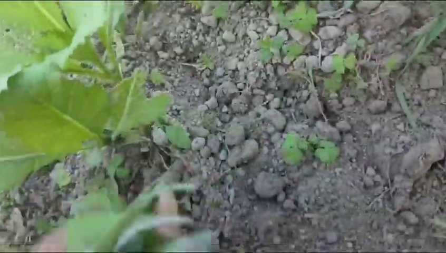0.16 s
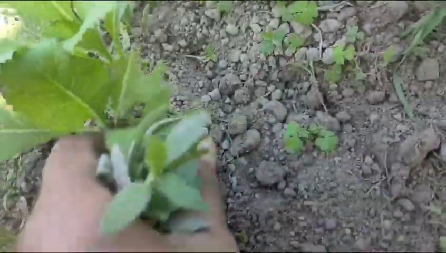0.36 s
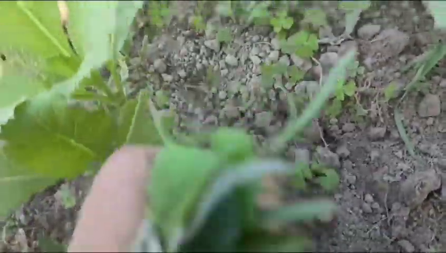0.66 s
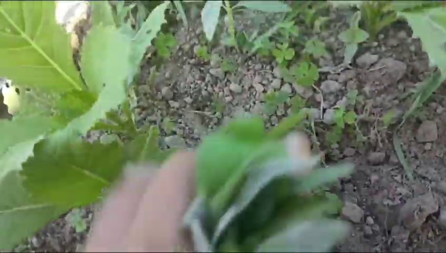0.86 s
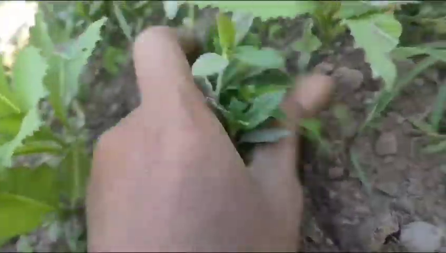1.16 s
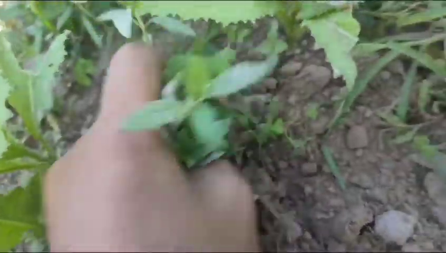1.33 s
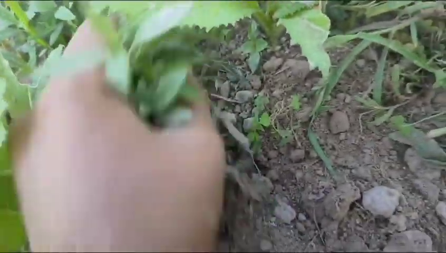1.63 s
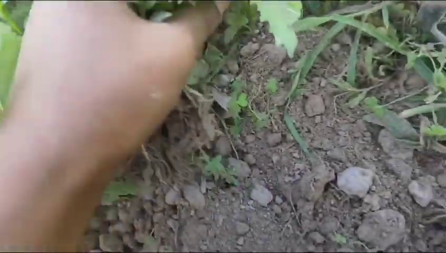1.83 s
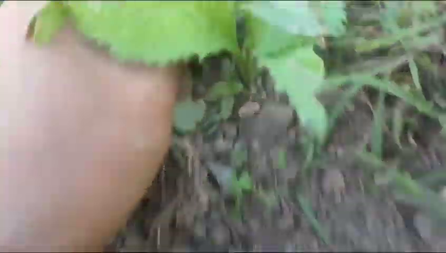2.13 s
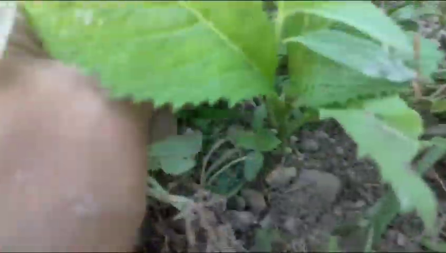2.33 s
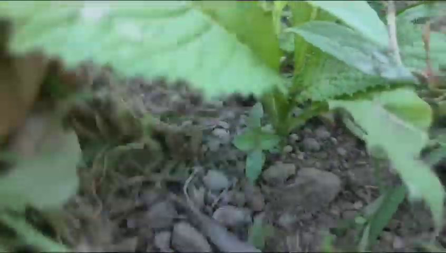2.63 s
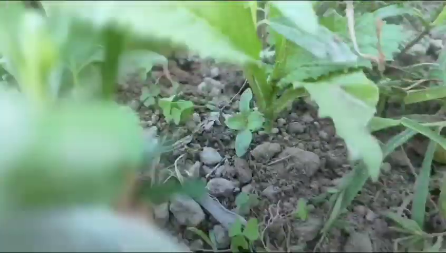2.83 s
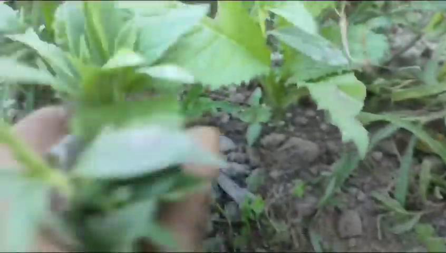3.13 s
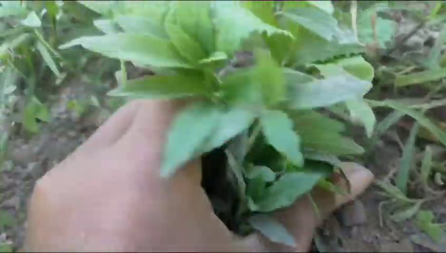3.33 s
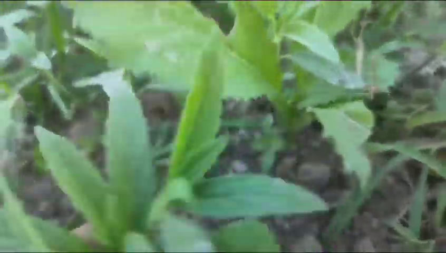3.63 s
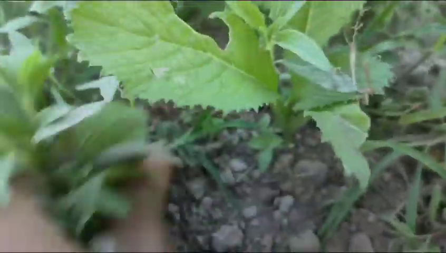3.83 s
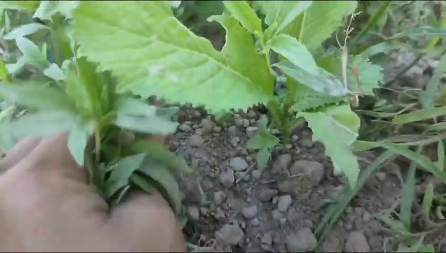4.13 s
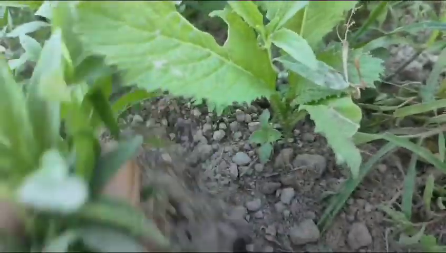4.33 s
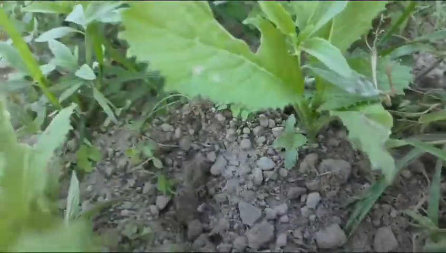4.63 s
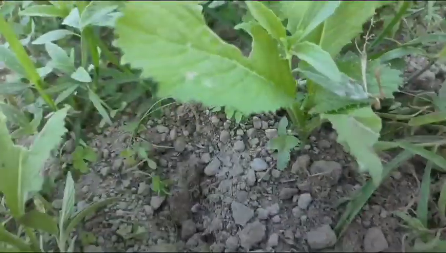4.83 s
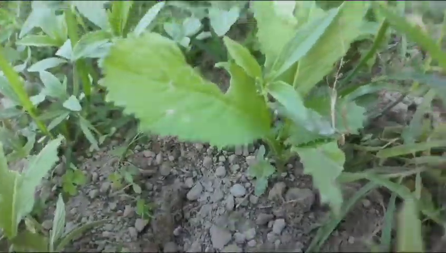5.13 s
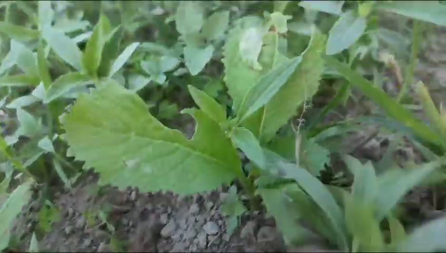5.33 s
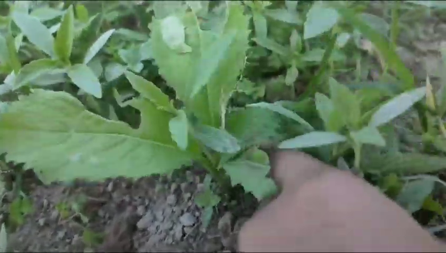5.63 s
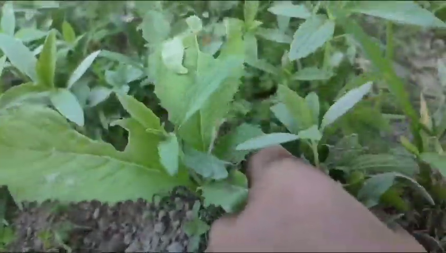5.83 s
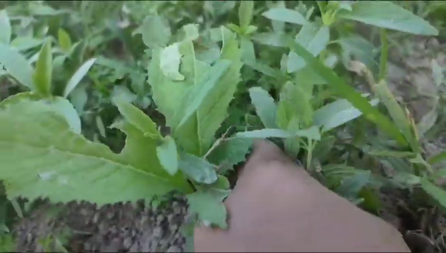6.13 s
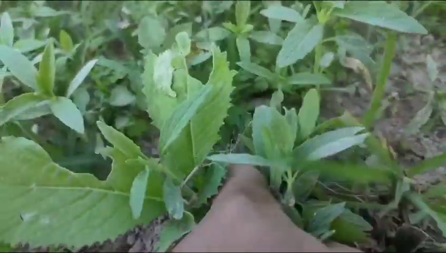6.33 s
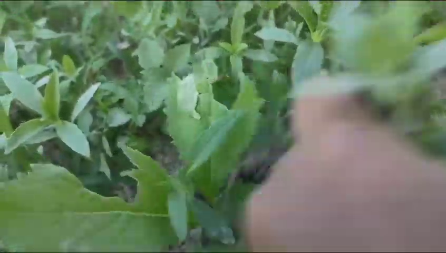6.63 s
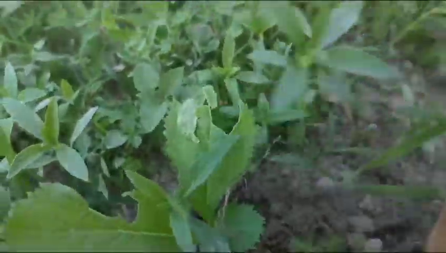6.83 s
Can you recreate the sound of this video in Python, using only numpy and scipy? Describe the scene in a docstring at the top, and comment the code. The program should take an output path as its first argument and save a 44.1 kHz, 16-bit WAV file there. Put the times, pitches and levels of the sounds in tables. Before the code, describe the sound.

A hand pulls weeds from dry soil very close to the microphone, mostly left of centre. Soft leaf swishes, finger scrapes and crumbling earth come in uneven strokes throughout, with small stem snaps at about 1 and 1.4 seconds. From 2.2 seconds the tugging thickens, and roots break with strong, crisp snaps at 2.5. At 2.9 seconds the bunch hits the microphone on the left: one sharp, slightly distorted knock with a short low thump and a spray of crumbs, by far the loudest sound. Light rustling continues, with a tick at 3.5 seconds and several snaps around 4.2. After a softer stretch with scattered ticks, another cluster of snaps and crumbling soil comes at about 6.6. Behind it all lie a quiet field hush, a faint unsteady rumble and a low purr that comes and goes. A very faint, thin whistle rises between 1.2 and 1.9 seconds.

```python
"""Weeding dry soil, close up

A hand pulls weeds just under a phone with two microphone ports, the left one nearer. Leaves swish,
fingers scrape, soil crumbles, stems and roots snap, and once the bunch knocks the phone hard enough
to clip. Behind lie a low rumble, a purr that comes and goes, a thin rising whistle and a quiet field."""
import sys
import numpy as np
from scipy import signal
from scipy.fft import rfft, irfft, next_fast_len
from scipy.io import wavfile
from scipy.ndimage import uniform_filter1d

SR = 44100
rng = np.random.default_rng(int(sys.argv[2]) if len(sys.argv) > 2 else 0)


def generate_wav(sig):
    """Save sig (samples, or channels by samples) to the path in sys.argv[1] as 16-bit PCM at SR."""
    pcm = np.round(np.clip(np.atleast_2d(sig).T, -1, 1) * 32767).astype(np.int16)
    wavfile.write(sys.argv[1], SR, pcm)


N = 307813
FFT_SIZE = next_fast_len(N, real=True)

# tone of each noise at the microphone: (frequency [Hz], relative spectral level [dB])
FIELD_SPECTRUM = [(130, -5), (250, -4), (400, -9), (600, -14), (1000, -18.5), (2000, -21.5), (3000, -26),
                  (5000, -31), (6500, -31), (7600, -28.5), (8600, -25), (10000, -28.5), (13000, -31),
                  (15800, -34)]
RUMBLE_SPECTRUM = [(15, -43), (30, -18.5), (45, -6), (62, -4.5), (90, -0.5), (120, -11), (200, -26)]
LEAF_SPECTRUM = [(2600, -32.5), (3500, -7), (5000, -6), (6600, -9), (8000, 0), (11000, -0.5), (14800, -3.5),
                 (16500, -12)]
SCRAPE_SPECTRUM = [(1600, -31.5), (2250, -12), (2600, -3), (2900, -12), (4500, -17), (6500, -30.5)]
SOIL_SPECTRUM = [(250, -20), (500, -1), (1000, -2.5), (1500, -2), (2000, -5), (3500, -21)]
# course of the rumble: (time [s], level [dB])
RUMBLE_LEVELS = [(0, -58.5), (.33, -68), (.5, -63), (.89, -66.5), (1.28, -60.5), (1.52, -60), (2.19, -58.5),
                 (2.45, -59.5), (2.84, -53.5), (3.26, -63), (3.77, -61.5), (4.15, -55.5), (4.48, -59),
                 (4.69, -65.5), (4.98, -56), (5.11, -66), (5.28, -60), (5.5, -69), (5.62, -63),
                 (5.9, -65.5), (6.2, -61.5), (6.3, -68.5), (6.7, -59.5), (6.93, -60)]
# swells in the background: (peak time [s], rise [s], fall [s], level [dB])
WHISTLE_SWELLS = [(1.3, .07, .25, -77), (1.45, .3, .2, -81), (1.79, .12, .09, -78)]
PURR_SWELLS = [(0.02, .2, 0.26, -57), (0.486, 0.027, 0.055, -67), (0.62, 0.1, .2, -69),
               (1.03, 0.086, 0.1, -58), (1.29, 0.17, 0.44, -64), (1.42, 0.48, 0.11, -72),
               (1.9, 0.4, .9, -70), (2.5, 0.37, 0.21, -56), (2.84, 0.26, .4, -60),
               (2.961, .3, 0.044, -58.5), (3.151, .5, 0.15, -67), (3.41, 0.16, 0.26, -71),
               (3.63, 0.14, .4, -57.5), (3.98, .3, .3, -68.5), (3.855, .2, .04, -51.5), (4.15, .7, .6, -63),
               (4.49, 0.3, 0.78, -61), (4.99, 0.63, 0.09, -57), (5.27, 0.25, 0.095, -71),
               (5.62, 0.19, 0.56, -61.5), (5.98, .3, 0.38, -73.5), (6.22, .3, 0.073, -74),
               (6.31, .13, 0.2, -77), (6.45, 0.037, 0.24, -69.5), (6.65, 0.093, 0.17, -58)]
# hand strokes, except the last row, which is a brief click at the very end, to the right:
# (peak time [s], rise [s], fall [s], leaf level [dB], scrape level [dB], soil level [dB],
# leaves' left minus right [dB])
RUSTLE_SWELLS = [(0.025, 0.25, 0.061, -57.5, -71.5, -67.5, 6), (0.251, .15, 0.035, -61.5, -69, -69, 3),
                 (0.488, 0.038, 0.043, -60, -79, -72.5, 11.5), (0.594, 0.14, 0.11, -83, -80.5, -71.5, 3),
                 (0.786, 0.033, 0.11, -73, -88, -91, 8), (0.888, .07, .07, -76, -68, -76, -1),
                 (1.024, 0.05, 0.14, -70, -73, -62.5, 4.5), (1.265, 0.044, 0.1, -61.5, -70.5, -70, 4),
                 (1.407, 0.24, 0.09, -71, -73, -64.5, 5), (1.609, 0.048, .3, -85, -90, -80, 2),
                 (1.781, 0.055, 0.13, -64.5, -66, -66, 12), (2.03, 0.73, 0.18, -80, -76.5, -71.5, 8),
                 (2.195, 0.2, 0.76, -69, -73.5, -69, 9), (2.354, 0.063, 0.089, -63.5, -61.5, -58.5, 11.5),
                 (2.509, 0.064, 0.19, -61.5, -59.5, -56.5, 8), (2.589, 0.29, 0.096, -61, -75, -63, 14),
                 (2.724, 0.081, 0.13, -57.5, -72, -59.5, 15.5), (2.805, 0.15, .15, -61, -69, -61, 9.5),
                 (2.912, 0.084, .07, -47.5, -65, -47, 0.5), (3.133, 0.23, 0.17, -66, -68, -64.5, 10),
                 (3.316, 0.067, .16, -84, -78.5, -72.5, 2), (3.501, 0.071, .1, -63.5, -75, -71.5, 7),
                 (3.549, 0.073, 0.094, -67, -68, -63, 3.5), (3.769, 0.13, 0.28, -78, -80.5, -82, 3.5),
                 (3.96, 0.28, 0.38, -73, -75.5, -68.5, 9), (4.142, 0.16, .2, -58, -63, -69, 4.5),
                 (4.23, 0.22, 0.3, -76, -73, -61, 3.5), (4.35, .3, 0.11, -66, -72, -64.5, 11.5),
                 (4.645, 0.066, 0.041, -76.5, -84.5, -73, -0.5), (4.814, 0.049, 0.37, -75.5, -83, -70, 8),
                 (4.926, .09, 0.084, -60, -64, -76, 8.5), (5.151, 0.21, 0.22, -77.5, -85, -82, 2),
                 (5.27, 0.076, .06, -68, -68.5, -74, -5.5), (5.62, .25, 0.29, -84, -86.5, -78, -1.5),
                 (5.822, .15, 0.13, -75, -85.5, -73, 1), (5.965, 0.064, 0.084, -64, -68, -69, 0),
                 (6.09, 0.12, .3, -73, -78.5, -73.5, -1), (6.178, 0.29, 0.075, -75, -75.5, -76, 0.5),
                 (6.298, 0.072, 0.18, -81, -78.5, -74, 2), (6.45, 0.11, 0.091, -72.5, -74, -73, 3.5),
                 (6.603, 0.024, 0.18, -66, -63.5, -53.5, 1.5), (6.71, 0.15, 0.096, -66, -78, -70.5, -4),
                 (6.84, .3, 0.35, -79.5, -90.5, -78, -3), (6.98, 0.02, .1, -63.5, -85, -59.5, -15)]
# lift or cut of the swish above 11.5 kHz: (time [s], gain [dB])
LEAF_TREBLE = [(0, -5.5), (2, -5.5), (2.4, -12), (2.7, 3.5), (3.2, -5.5), (4.2, -0.5), (5.3, -0.5),
               (6.2, 1.5), (6.98, 2.5)]
# stems and roots breaking, each level before its part's trim: (time [s], ring pitch [Hz], ring [dB],
# bite [dB], crack [dB], thud [dB], left minus right [dB], ring T60 [s])
STEM_BREAKS = [(0.578, 980, -58, -59, -66, -70, 12, 0.0052),
               (0.5999, 1810, -55.5, -71, -72, -67, -18, 0.0063),
               (1.0227, 1970, -43.5, -58, -63, -48.5, -4, 0.0071),
               (1.0434, 1200, -52, -60, -72, -54, 3, 0.007),
               (1.391, 1320, -37.5, -44.5, -46.5, -48.5, 4.5, 0.0032),
               (1.6949, 1880, -57.5, -67, -79, -69, -16, 0.0074),
               (2.188, 3530, -66, -66, -52, -75, 8, 0.004), (2.25, 3420, -56, -60, -62, -75, 9, 0.0035),
               (2.265, 2500, -59, -60, -52, -70, 10, 0.004), (2.295, 596, -54, -63, -56, -58, 7, 0.0085),
               (2.3327, 1730, -30.5, -44, -58, -46, 8.5, 0.0042),
               (2.3389, 800, -46.5, -47, -64, -44.5, 8, 0.0098),
               (2.402, 690, -62, -50, -47.5, -69, 12, 0.007),
               (2.488, 1800, -16.5, -21.5, -27, -30, 4.5, 0.0028),
               (2.5043, 635, -33.5, -25.5, -39, -59, 4.5, 0.0054),
               (2.5275, 1060, -36, -29.5, -44, -39, 0, 0.0075),
               (2.5322, 1680, -21.5, -25, -48, -40, 7.5, 0.0029),
               (2.8544, 730, -57, -51, -31.5, -63, -8, 0.0056),
               (2.8636, 1090, -38.5, -41, -25, -56, 14, 0.0051),
               (2.887, 1086, -46, -46, -50.5, -58.5, 9, 0.0078),
               (3.5453, 2540, -52.5, -52.5, -40.5, -66, 4.5, 0.0057),
               (4.2147, 1314, -36.5, -43.5, -43, -51, 6, 0.0063),
               (4.245, 1260, -38.5, -46, -60, -54, 13, 0.0061),
               (4.2473, 1250, -35.5, -48, -55, -67, 6, 0.0068),
               (4.3088, 1430, -48.5, -45.5, -57, -58, 7, 0.007),
               (4.3254, 595, -45, -45, -37.5, -56, 10, 0.0029),
               (4.7116, 1600, -59, -75, -73.5, -58.5, -4.5, 0.0075),
               (4.8267, 794, -50.5, -73, -60, -54.5, 10, 0.008),
               (4.9427, 2620, -67, -44, -45, -59.5, 15.5, 0.0081),
               (5.9347, 2497, -52.5, -52, -53, -68.5, -5.5, 0.0077),
               (5.9845, 2257, -58.5, -56.5, -55.5, -61.5, -11, 0.011),
               (6.1476, 600, -73.5, -66, -50.5, -78.5, 1.5, 0.007),
               (6.309, 2290, -56.5, -53.5, -57, -70, -10, 0.008),
               (6.398, 686, -76.5, -71, -56, -74, 14, 0.0085),
               (6.4393, 1270, -50.5, -43, -47, -61.5, 3.5, 0.0061),
               (6.5895, 1395, -27, -47.5, -58, -50.5, 7.5, 0.0066),
               (6.5987, 935, -30, -46, -55, -45, 4, 0.0055), (6.613, 1260, -44, -51, -63, -57, 12.5, 0.007),
               (6.6204, 2340, -39.5, -43, -37.5, -46, 7.5, 0.0062),
               (6.6527, 1546, -25, -33, -48, -30, 9, 0.009),
               (6.83, 1328, -58.5, -74.5, -74, -74.5, 0, 0.012)]
# the bunch bouncing by the left port: (time [s], level [dB], pitch [Hz], T60 [s], build-up [s])
CASE_BOUNCES = [(2.8975, -18, 900, .012, .0003), (2.9004, 14, 1000, .0045, .0004),
                (2.90245, 9, 1020, .006, .00015), (2.9079, -1, 1400, .007, .0003)]
# the shaken case at the left port, then the right: (start [s], level [dB])
CASE_SWINGS = [(2.9060, -6.5), (2.9007, -2.5)]

PORT_LAG = 12  # samples from left port to right
FADE_DB, SWELL_POWER = 20, 1.1  # drop one rise or fall from a peak; a power above 1 rounds the top
FIELD_DB = -70.7
WHISTLE_HZ, WHISTLE_CLIMB_HZ_PER_S = 2030, 680  # pitch at the first swell's peak, and its climb
PURR_PULSES_PER_S, PURR_HZ, PURR_WIDTH_HZ = 46, 255, 130
REST_DB = -92, -94.5, -88  # leaves, scrape and soil while the hand rests
CRACK_BAND_HZ = 6000, 12500
SLAP_S, SLAP_DB, SLAP_T60_S = 2.9040, 9, 0.0031
CASE_START_HZ, CASE_END_HZ, CASE_SETTLE_S, CASE_T60_S = 320, 58.3, 0.0021, 0.055


def undb(db):
    return 10 ** (np.asarray(db) / 20)


def unit_rms(x):
    return x / np.sqrt(np.mean(x ** 2))


def colour(x, spectrum):
    """Shape a noise to a spectrum, at rms 1."""
    hz, db = np.transpose(spectrum)
    bin_hz = np.arange(FFT_SIZE // 2 + 1) * SR / FFT_SIZE
    gain = undb(np.interp(np.log(bin_hz + 1), np.log(hz), db, -90, -90))
    return unit_rms(irfft(rfft(x, FFT_SIZE) * gain, FFT_SIZE)[..., :N])


def curve(table):
    """Join (time, level) points with straight lines."""
    return np.interp(np.arange(N) / SR, *np.transpose(table))


def wander(rate_hz):
    """Glide between random values; spread near 1."""
    hold = int(SR / rate_hz)
    steps = np.repeat(rng.standard_normal(N // hold + 1), hold)
    return 1.2 * uniform_filter1d(steps, hold)[:N]


def swells(rows, levels_db):
    """Gain over time: each row climbs to its peak and falls away; powers add."""
    t, power = np.arange(0, N + 128, 128) / SR, 0
    for (peak_s, rise, fall, *_), db in zip(rows, levels_db):
        from_peak = np.maximum((peak_s - t) / rise, (t - peak_s) / fall)
        power = power + undb(np.reshape(db, (-1, 1)) - FADE_DB * from_peak ** SWELL_POWER) ** 2
    return np.array([np.interp(np.arange(N) / SR, t, gain) for gain in np.sqrt(power)])


def port_noise(alike_hz):
    """Noise at both ports: alike below alike_hz, unrelated above."""
    shared, *own = rng.standard_normal((3, N))
    lows = signal.lfilter(*signal.butter(1, alike_hz, fs=SR), shared)
    highs = signal.lfilter(*signal.butter(1, alike_hz, "high", fs=SR), own)
    return np.array([lows, np.roll(lows, PORT_LAG)]) + highs


def ring(hz, t60, push_s):
    """A mode struck by a push that takes a moment to build."""
    t = np.arange(4096) / SR
    return (1 - np.exp(-t / push_s)) ** 2 * undb(-60 * t / t60) * np.sin(2 * np.pi * hz * t)


def burst(t60, low_hz, high_hz, push_s=0.00038, size=4096):
    """Noise at both ports that builds in a moment and dies away."""
    band = signal.butter(2, [low_hz, high_hz], "band", fs=SR, output="sos")
    t = np.arange(size) / SR
    noise = unit_rms(signal.sosfilt(band, rng.standard_normal((2, size))))
    return noise * (1 - np.exp(-t / push_s)) * undb(-60 * t / t60)


def add(out, start_s, sound):
    i = int(start_s * SR)
    out[:, i:i + sound.shape[1]] += sound[:, :N - i]


def grains(spread_db, share):
    """Dense tiny cracks, a few much stronger than the rest."""
    strength = undb(spread_db * np.minimum(rng.exponential(size=(2, N)), 7))
    cracking = rng.random((2, N)) < share
    return strength * cracking * rng.standard_normal((2, N))


def patchy(x, spread_db, bins):
    """Small random patches of time and pitch stand out or sink: a flickering, faintly ringing grain."""
    spectrum = signal.stft(x, nperseg=512)[2]
    patches = uniform_filter1d(rng.standard_normal(spectrum.shape[1:]), size=bins, axis=0)
    patches = uniform_filter1d(patches, size=2 * bins, axis=1)
    return signal.istft(spectrum * undb(spread_db * unit_rms(patches)), nperseg=512)[1][:, :N]


def field():
    """The steady hush of the field around the microphone."""
    return colour(port_noise(alike_hz=300), FIELD_SPECTRUM) * undb(FIELD_DB)


def rumble():
    """A low, unsteady rumble, much alike at both ports."""
    noise = colour(port_noise(alike_hz=170), RUMBLE_SPECTRUM)
    return noise * undb(curve(RUMBLE_LEVELS) + 1.5 * wander(11))


def whistle():
    """A thin tone in the background, dead centre, that climbs and breaks up."""
    hz = WHISTLE_HZ + WHISTLE_CLIMB_HZ_PER_S * (np.arange(N) / SR - WHISTLE_SWELLS[0][0])
    gain = swells(WHISTLE_SWELLS, np.transpose(WHISTLE_SWELLS)[-1])[0] * undb(5.4 * wander(41))
    cycles = np.cumsum(hz + 14 * wander(54)) / SR
    return 2 ** .5 * gain * np.sin(2 * np.pi * cycles)


def purr():
    """Uneven pulses and about as much noise ring a hollow low resonance that comes and goes."""
    cycles = np.cumsum(PURR_PULSES_PER_S * (1 + 0.18 * wander(25)) / SR)
    pulses = np.diff(np.floor(cycles), prepend=0) * undb(3.5 * wander(40))
    drive = unit_rms(pulses) + 1.1 * port_noise(alike_hz=500)
    band = signal.iirpeak(PURR_HZ, PURR_HZ / PURR_WIDTH_HZ, SR)
    hollow = unit_rms(signal.lfilter(*band, signal.lfilter(*band, drive)))
    return hollow * swells(PURR_SWELLS, np.transpose(PURR_SWELLS)[-1])


def hand():
    """Just under the phone, leaves slide together, fingers scrape round stems, crumbs shift and fall."""
    rows = np.array(RUSTLE_SWELLS)
    side_db = np.outer(rows[:, -1], [1, -1]) / 2
    pan_shares = 1, .6, .5  # longer waves bend round the phone, so scrape and soil pan less
    leaf_gain, scrape_gain, soil_gain = (
        np.hypot(swells(rows, db[:, None] + share * side_db), undb(rest_db))
        for db, share, rest_db in zip(rows.T[3:6], pan_shares, REST_DB))
    leaves = colour(grains(spread_db=2.16, share=0.3), LEAF_SPECTRUM)
    leaves *= leaf_gain * undb(wander(90) + 2.1 * wander(28))
    treble = signal.sosfiltfilt(signal.butter(3, 11500, "high", fs=SR, output="sos"), leaves)
    leaves += (undb(curve(LEAF_TREBLE)) - 1) * treble
    scrape = colour(grains(spread_db=2.5, share=.2), SCRAPE_SPECTRUM)
    scrape *= scrape_gain * undb(1.4 * wander(50))
    soil = colour(grains(spread_db=3.0, share=0.22), SOIL_SPECTRUM)
    soil *= soil_gain * undb(1.2 * wander(40))
    return patchy(leaves + scrape + soil, spread_db=3.6, bins=4)


def snaps():
    """Close by, fibres creak; the break rings the stem, bites, cracks, tugs the soil and throws crumbs."""
    out = np.zeros((2, N))
    for time_s, hz, ring_db, bite_db, crack_db, thud_db, pan_db, t60 in STEM_BREAKS:
        sides = undb([[pan_db / 2], [-pan_db / 2]])
        stem = undb(ring_db + 10) * ring(hz, t60, push_s=0.00014)
        bite = undb(bite_db + 7.5) * ring(2900, 0.0022, push_s=0.00011)
        thud = ring(240, 0.011, push_s=.0008) + undb(5) * ring(400, 0.011, push_s=0.00049)
        body = stem + bite + undb(thud_db + 2.5) * thud
        crack = undb(crack_db + 1.5) * burst(.006, *CRACK_BAND_HZ)
        crumbs = undb(ring_db - 23) * burst(0.027, 560, 2700)
        snap = np.array([body, np.roll(body, PORT_LAG)]) + crack + crumbs
        add(out, time_s - .0003, snap * sides)  # starts just before it is heard to strike
        creak = undb(ring_db - 25) * burst(0.038, 500, 3600, size=512)[:, ::-1]  # grows into the break
        add(out, time_s - 512 / SR, creak * sides)
    return out


def knock():
    """The bunch hits by the left port, shadowed at the right; the case swings and crumbs rain down."""
    out = np.zeros((2, N))
    shadow = undb([[0], [-18.5]])
    for time_s, db, hz, t60, push_s in CASE_BOUNCES:
        bounce = ring(hz, t60, push_s) + undb(-11.5) * ring(3300, 0.0027, push_s)
        add(out, time_s, -undb(db) * shadow * bounce)
    leaf_slap = undb([[SLAP_DB], [SLAP_DB - 12.5]]) * burst(SLAP_T60_S, *CRACK_BAND_HZ, push_s=0.00037)
    low_crumbs = undb([[-29], [-36]]) * burst(0.1, 750, 3500, push_s=0.0021)
    high_crumbs = undb([[-36], [-41]]) * burst(0.1, 7000, 15000, push_s=0.0017)
    add(out, SLAP_S, leaf_slap + low_crumbs + high_crumbs)
    t = np.arange(8192) / SR
    settled = 1 - np.exp(-t / CASE_SETTLE_S)  # the swing slows as it dies
    cycles = CASE_END_HZ * t + (CASE_START_HZ - CASE_END_HZ) * CASE_SETTLE_S * settled
    swing = (1 - np.exp(-t / 0.00061)) * undb(-60 * t / CASE_T60_S) * np.sin(2 * np.pi * cycles)
    for port, (start_s, db) in enumerate(CASE_SWINGS):
        add(out[port:port + 1], start_s, undb(db) * swing[None])
    return out


def scene():
    """The close weeding and its background, as they reach the two ports."""
    return rumble() + field() + hand() + snaps() + knock() + purr() + whistle()


def record(dry):
    """The phone's converter clips, then the top is cut at 15.7 kHz."""
    lowpass = signal.ellip(8, .2, 60, 15700, fs=SR, output="sos")
    return signal.sosfilt(lowpass, np.clip(dry, -1, 1))


dry = scene()
out = record(dry)
generate_wav(out)
```